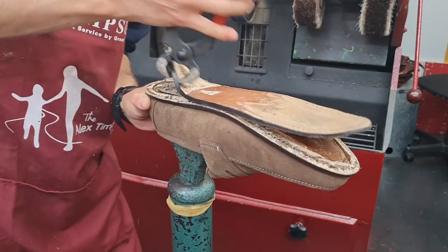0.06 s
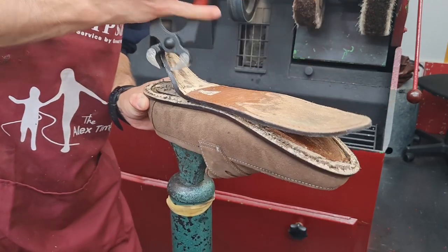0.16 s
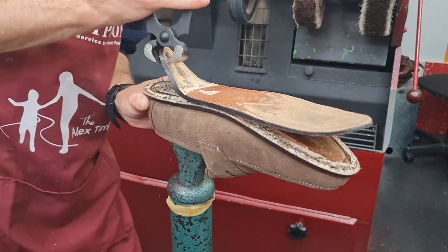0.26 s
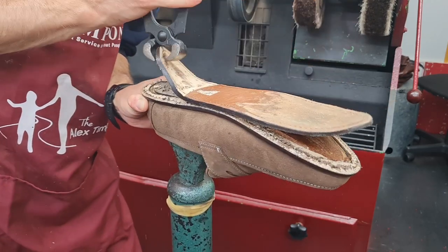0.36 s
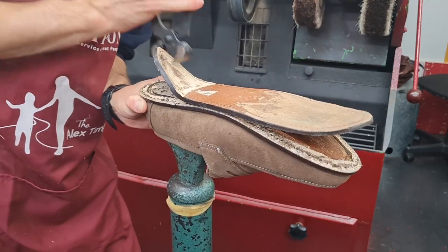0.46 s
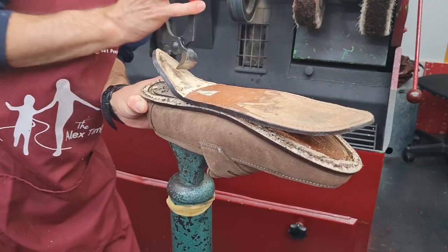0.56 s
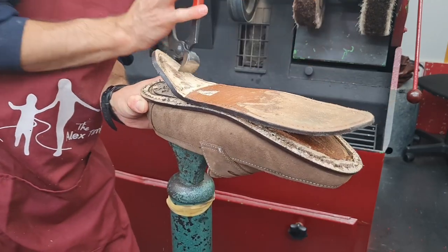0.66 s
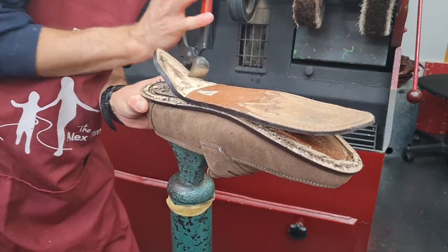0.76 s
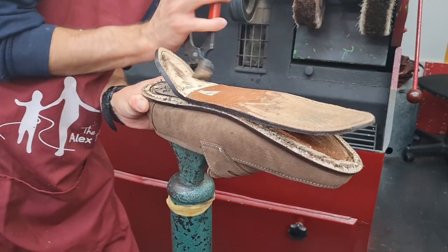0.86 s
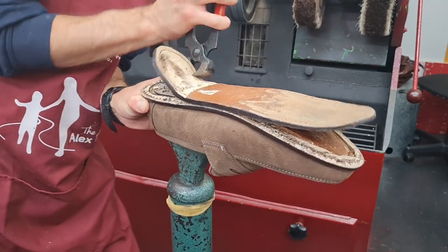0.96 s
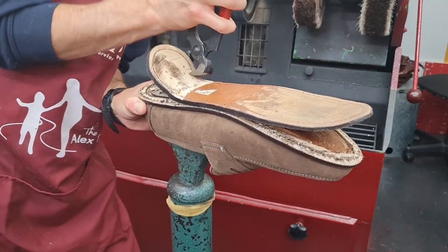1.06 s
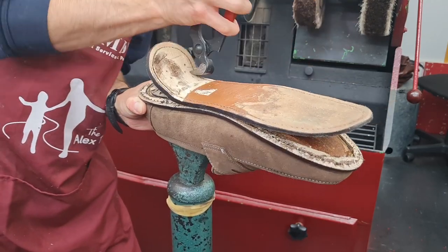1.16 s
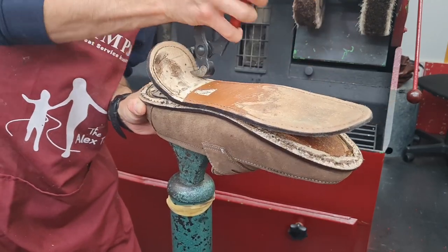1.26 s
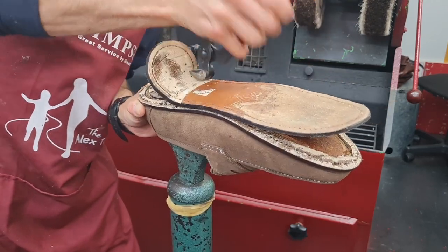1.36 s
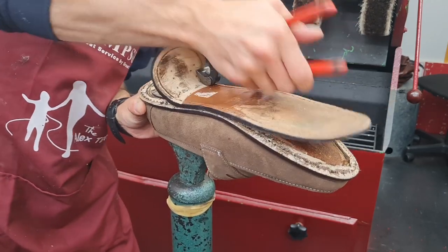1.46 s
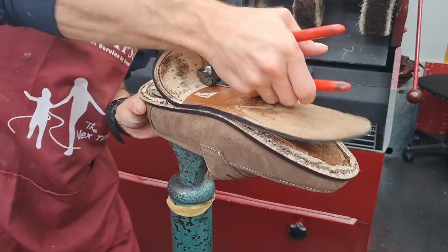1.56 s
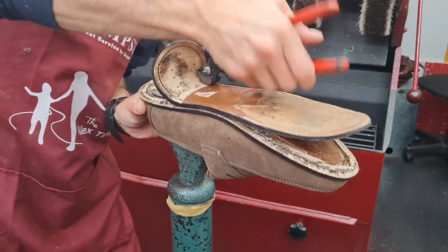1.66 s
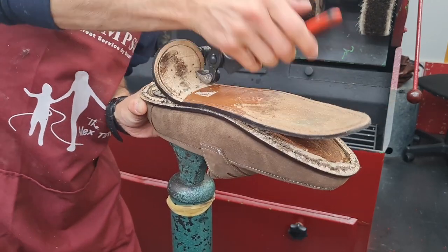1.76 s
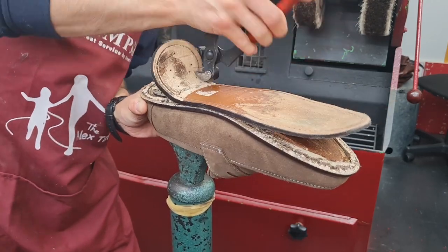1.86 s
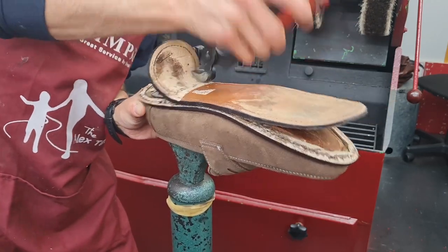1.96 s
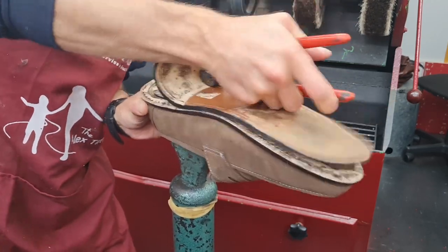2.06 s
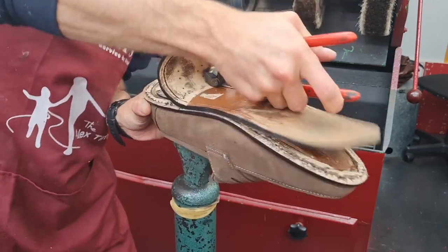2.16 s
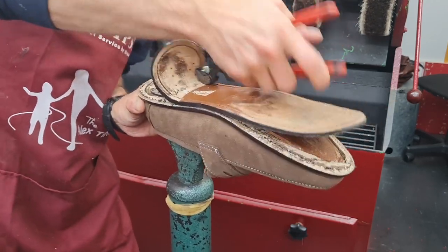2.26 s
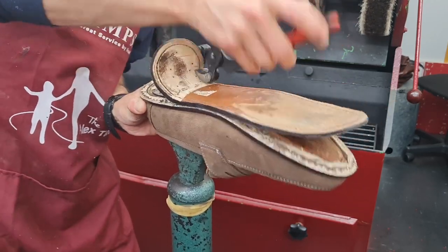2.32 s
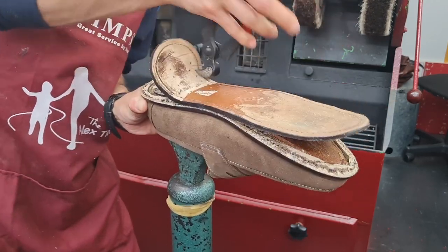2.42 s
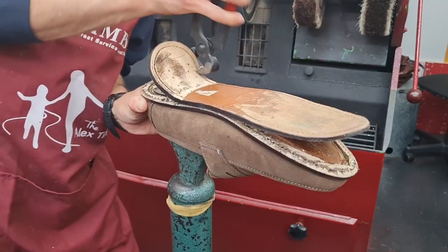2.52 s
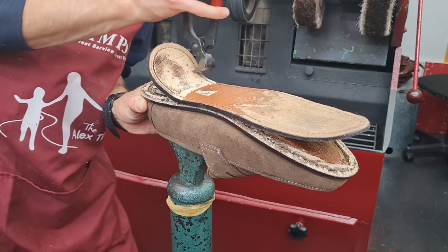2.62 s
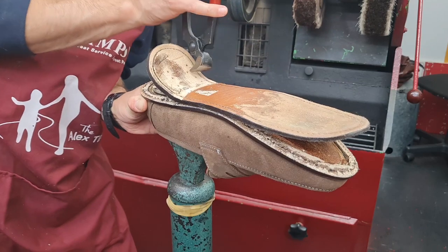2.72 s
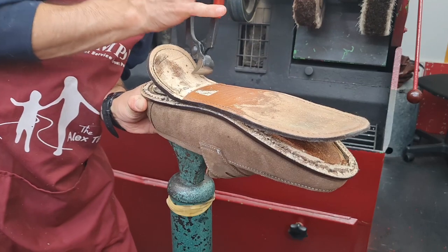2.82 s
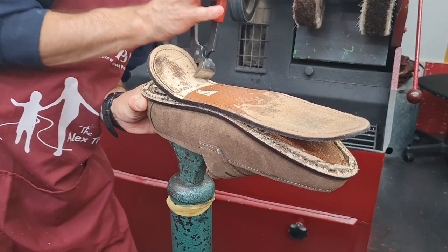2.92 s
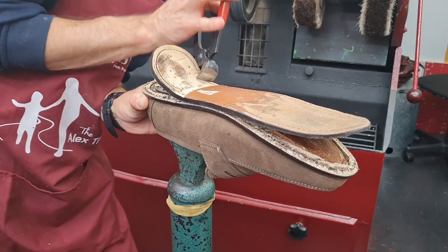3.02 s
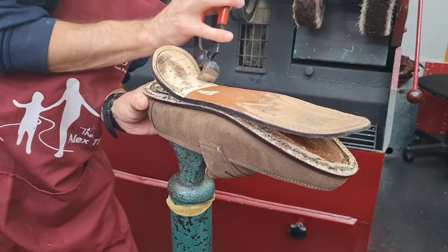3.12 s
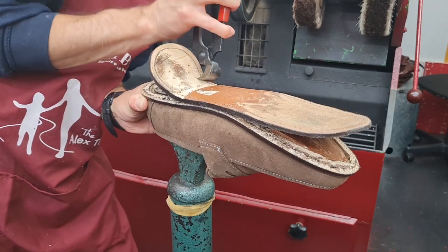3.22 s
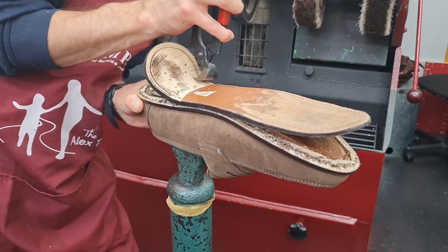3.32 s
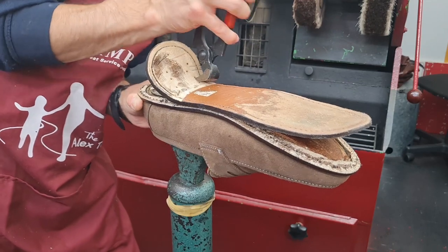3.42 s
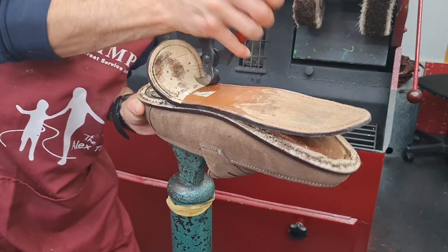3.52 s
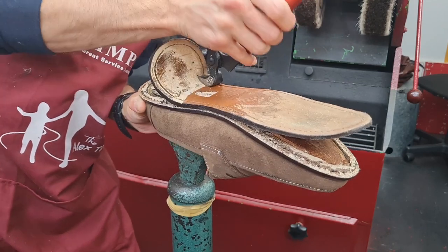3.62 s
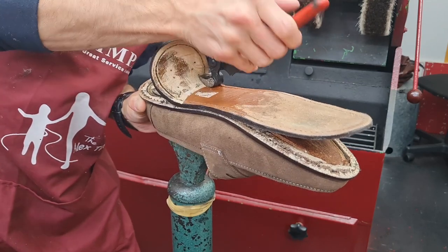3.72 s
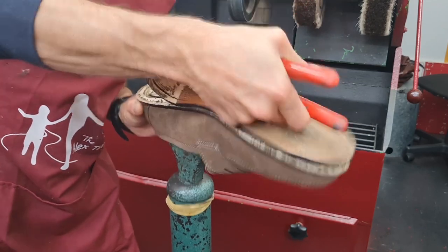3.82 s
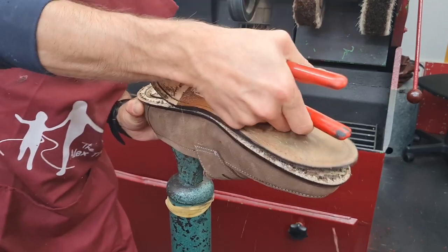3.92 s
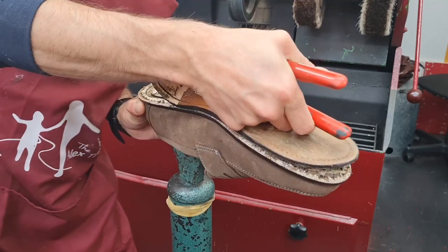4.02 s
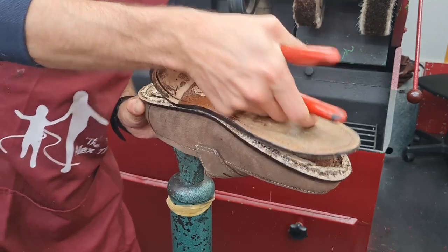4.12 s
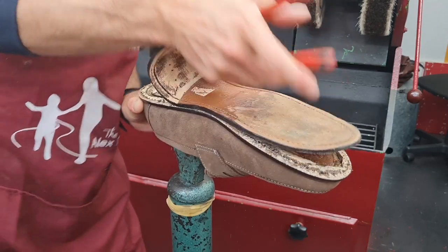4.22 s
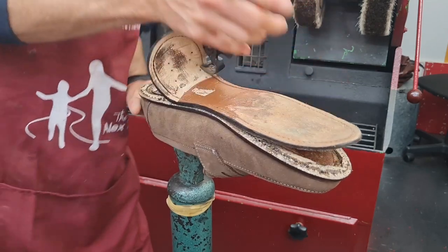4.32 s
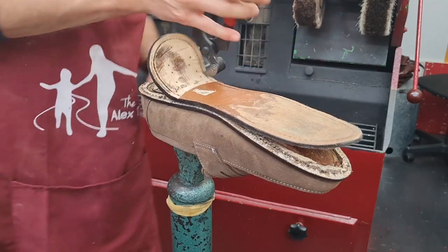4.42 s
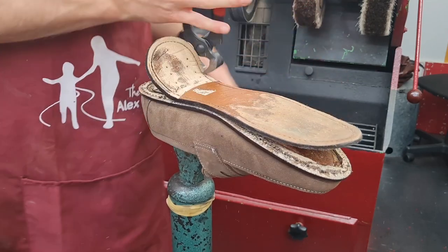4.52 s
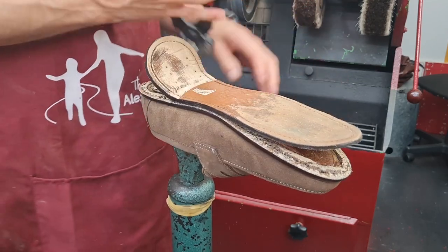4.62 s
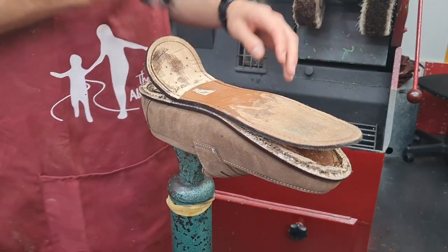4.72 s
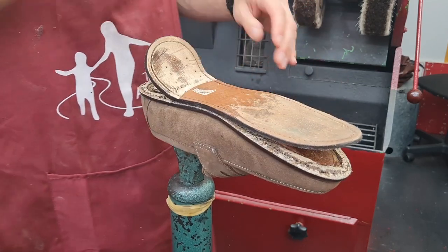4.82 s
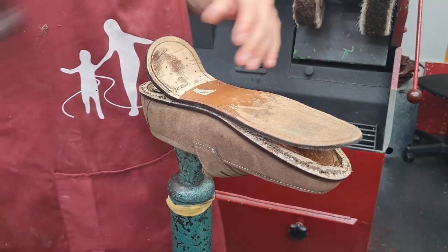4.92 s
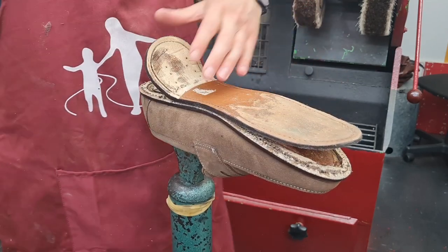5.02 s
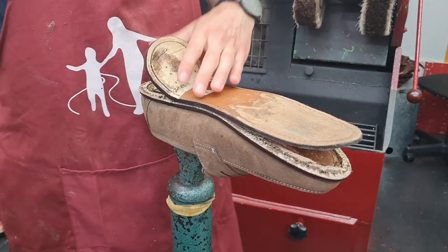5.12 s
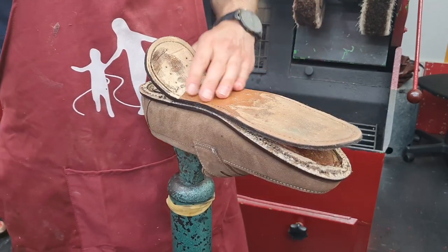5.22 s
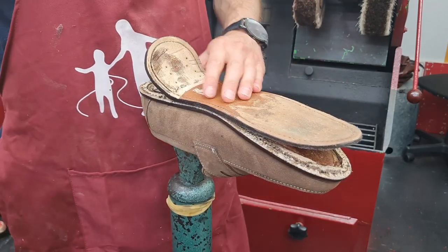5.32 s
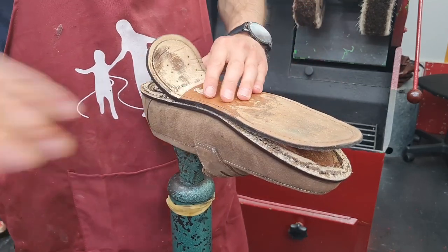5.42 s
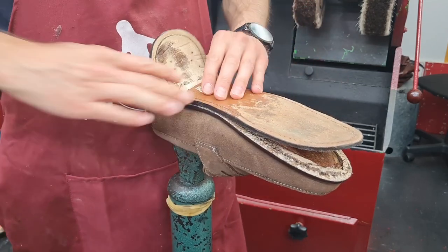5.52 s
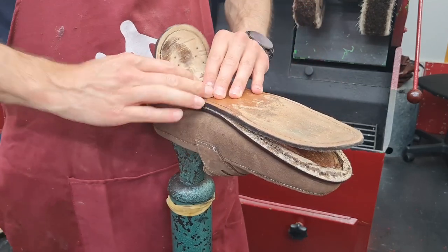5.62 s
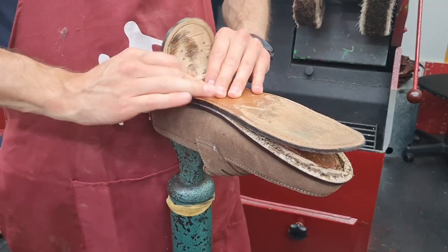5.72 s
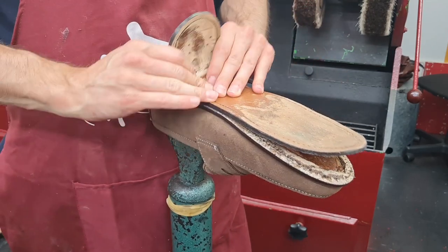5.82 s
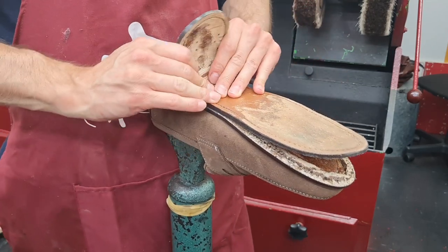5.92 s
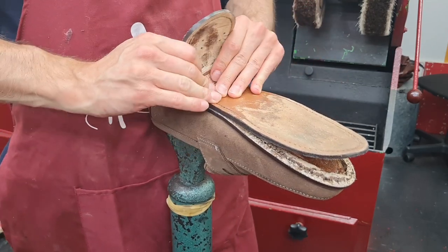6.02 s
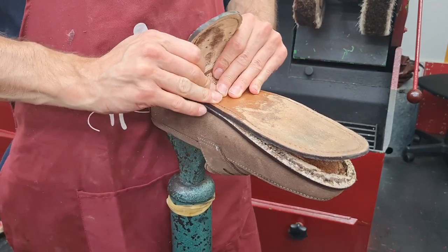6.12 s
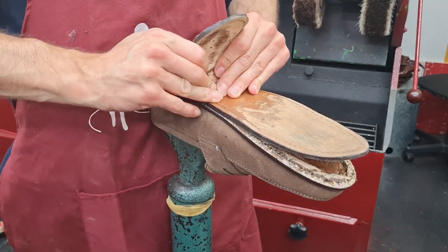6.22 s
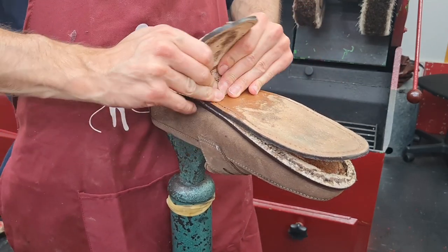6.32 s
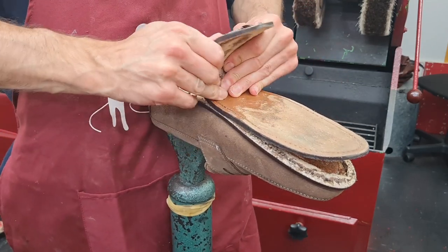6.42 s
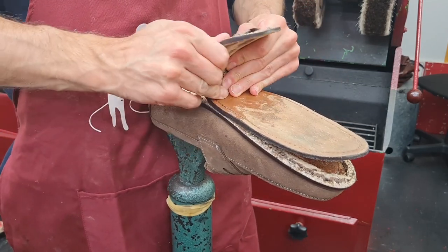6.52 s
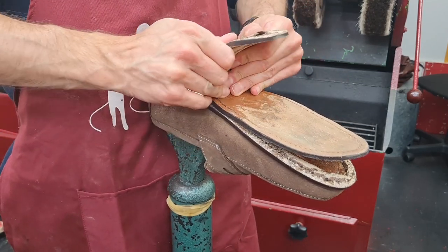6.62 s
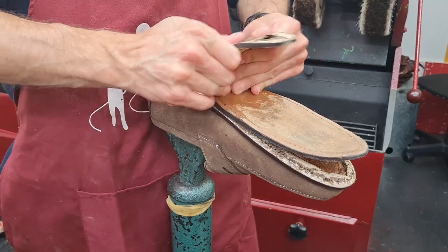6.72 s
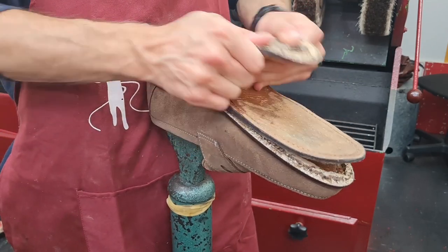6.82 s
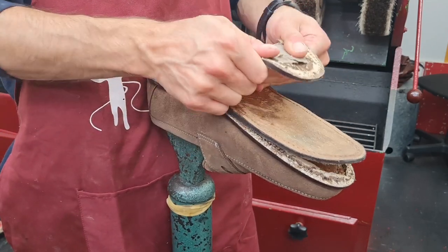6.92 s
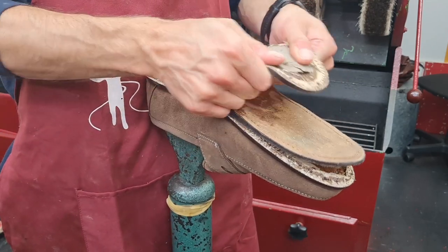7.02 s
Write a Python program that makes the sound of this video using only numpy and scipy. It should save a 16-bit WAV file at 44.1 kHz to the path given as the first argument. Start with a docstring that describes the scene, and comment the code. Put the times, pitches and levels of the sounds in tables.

```python
"""Steel pincers pry the sole off a shoe on an iron stand: noisy bites ring steel modes, then the shoe thumps.
The jaws squeak, tink and sing; short bursts make the sole crack and its threads tick.
The pincers drop on a bench slightly to the left, booming its top; then hands peel the leather back in
random crackling grains, with scuffs and creaks. A decaying noise room answers the blows in a small workshop,
over a low filtered-noise rumble, a drone, a distant wash and a faint wavering hum."""
import sys
import numpy as np
from scipy import signal
from scipy.fft import rfft, irfft, next_fast_len
from scipy.io import wavfile
from scipy.ndimage import map_coordinates

SR = 44100
rng = np.random.default_rng(int(sys.argv[2]) if len(sys.argv) > 2 else 0)


def transcribe(u):
    """Save the signal u as a 16-bit wav file named by the first command-line argument.

    u: samples, shape (n,) or (channels, n), limited to [-1, 1]; the rate is SR.
    q: integer samples, one column per channel.
    """
    v = np.clip(np.atleast_2d(u).T, -1, 1)
    q = np.round(v * 32767).astype(np.int16)
    wavfile.write(sys.argv[1], SR, q)


N = 311778
T = np.arange(SR * 3 // 4) / SR  # time axis of one short sound, s
TOP_HZ = 16000  # upper frequency limit of the finished sound

# rumble under the workshop: t/s, level before a common trim/dB
RUMBLE_LEVEL = [(.4, -54.5), (.8, -62.5), (1.4, -63), (2.7, -45.5), (3, -54.5), (3.7, -47), (4.7, -53.5),
                (5.2, -50), (6.1, -57), (6.9, -45), (7.05, -50.5)]
# drone and distant wash: t/s, drone level before a common trim/dB, wash level/dB
WASH_LEVEL = [(.45, -54.5, -60.5), (1.85, -58.5, -67.5), (2.9, -57.5, -67.5), (3.3, -52.5, -58),
              (3.8, -52.5, -60), (4.3, -44.5, -55), (4.65, -52, -55), (5.7, -53.5, -61), (6.3, -56, -66.5),
              (7, -50.5, -62.5)]
# background colours: f/Hz, density/dB
RUMBLE_COLOUR = [(15, -19.5), (30, -3), (44, 4), (70, 1.5), (115, -0.5), (180, -7), (400, -36.5),
                 (1000, -109.5)]
DRONE_COLOUR = [(90, -22), (135, -16), (185, -11), (220, -2.5), (250, 0.5), (300, 2), (380, -14),
                (600, -30.5), (2000, -69.5)]
WASH_COLOUR = [(150, -18), (400, 0.5), (650, 4), (850, -7), (1130, 0), (1400, -9), (2000, -9.5),
               (3200, -32), (8000, -26), (16000, -43)]
# faint hum that rises twice: t/s, f/Hz, level/dB
HUM = [(3.8, 226, -90), (4.3, 230, -50), (4.6, 233, -48), (4.85, 235, -57), (5.75, 244.7, -52.5),
       (6.1, 230, -58), (6.55, 239.7, -49), (6.77, 253.7, -41.5), (6.9, 265.2, -46), (7.05, 256, -66)]
# reverberation of the small room: f/Hz, t60/s
WALLS = [(60, 0.74), (150, 0.68), (300, 0.35), (700, 0.27), (2000, 0.19), (5000, 0.23), (14000, 0.27)]

# hands and jaws scuffing the leather: start t/s, length/s, stroke level/dB, crackle against rubbing before trims/dB
SCUFFS = [(0.177, 0.057, -50, -14), (0.438, 0.057, -57, -14), (0.74, 0.15, -61, -7),
          (0.945, 0.14, -56, -8.5), (1.492, 0.061, -56, 14), (1.739, .04, -68.5, -13),
          (2.314, .05, -52, -18.5), (2.808, 0.19, -60, -19), (3.031, 0.046, -49, -15.5),
          (3.3, 0.15, -70, -10), (3.677, 0.23, -71.5, 10), (4.189, 0.053, -56.5, -6.5),
          (4.337, .52, -62, -11.5), (5.06, .07, -57.5, -15.5), (5.639, 0.15, -68.5, 0.5)]
SCUFF_ATTACK_S, SCUFF_RELEASE_DB_PER_S = 0.041, 171.5
# friction colours of coarse rubbing and fine peeling: f/Hz, density/dB
RUB_COLOUR = [(200, -22), (700, -1), (1600, -1), (2600, 2), (4300, -5), (7000, -10.5), (16000, -34)]
PEEL_COLOUR = [(1000, -26), (4500, -8.5), (6500, -6.5), (10000, -7.5), (14500, -4), (16000, -6.5)]
# a light scuff is duller than a tug: f/Hz, gain/dB
LIGHT_RUB = [(500, 1), (1000, 3.5), (1600, 5.5), (2400, -0.5), (3500, -6), (5500, -0.5), (12000, -7)]
# tugs that peel the heel back: t of greatest effort/s, level/dB
TUGS = [(6.022, -55), (6.22, -54.5), (6.394, -49.5), (6.475, -41), (6.668, -50), (6.89, -37)]
TUG_RISE_DB_PER_S, TUG_FALL_DB_PER_S = 142, 167
TUG_RUB_DB = -3.5  # rubbing under the crackle of a tug
FLOOR_RUB_DB, FLOOR_CRACKLE_DB = -80, -80  # steady faint rubbing and crackle under the tugs
# creak of the bending sole: f/Hz, density/dB
CREAK_COLOUR = [(150, -24), (310, 7.5), (400, -5.5), (486, 5), (680, 0), (810, -4), (900, -19),
                (1130, -17.5), (1500, -33), (4000, -42)]
# creak of the hardest tug, its dB per dB of effort, its head start
CREAK_DB, CREAK_GROWS, CREAK_LEAD_S = -41, 1.52, 0.012

# threads and glue giving way: t/s, crack level/dB, fizz level/dB, left over right/dB
SNAPS = [(1.5, -58, -54.5, 1), (1.634, -67.0, -52.5, 4.5), (2.008, -71.5, -80.5, -1.5),
         (2.128, -52.5, -65.5, 1.5), (2.423, -61, -72.5, -1), (3.247, -58, -65.5, -2),
         (3.297, -63.5, -73.5, -4), (4.197, -57, -63, -4), (4.385, -65, -72, 2.5), (4.914, -46.5, -40, 8),
         (5.8, -64, -71.5, 0.5), (6.0965, -37.5, -35.5, 1), (6.1706, -48.5, -41, 0),
         (6.307, -53.5, -52, -3.5), (6.496, -58, -54, -0.5), (6.84, -42, -41, 0.5), (6.892, -46, -41.5, -3)]
# the sole cracking loose: t/s, level/dB, extra knock and crack/dB, length/s
CRACKS = [(3.8801, -27, -0.5, 0.002), (3.92, -33.5, -4.5, 0.0068), (3.9291, -23, 6.5, .0014),
          (3.934, -30.5, -3, .008), (4.139, -49, -3, .0016)]
# thud, boom, knock, crack and fizz of every sole crack, ahead of the extra snap: level/dB
CRACK_REGISTERS = [-2, -3, 3, -5.5, -7.5]

# pincers landing and bouncing on the bench: t/s, boom of the bench level/dB, clack level/dB, chatter/s
DROP = [(5.3056, -6.5, -17.5, 0.012), (5.332, -18, -24, 0.0066), (5.363, -34.5, -25, .0074),
        (5.398, -10.5, -10, .013), (5.42, -15, -14.5, 0.0078), (5.4598, -21, -16, 0.0055)]
# bench top modes: f/Hz, level/dB, t60/s
BENCH = [(57, -13, .25), (118, -11, .26), (148, -12, .2), (220, -5, .27), (252, -1, .31), (330, -9, .13),
         (385, -6, .13), (445, -6, .13), (520, -5, .17), (840, -11, .14), (885, -11, .14), (1000, -12, .1),
         (1085, -11, .12), (1819, -19, .15)]

# joint of the pincers tinking: t/s, level/dB, emphasised partial f/Hz
TINKS = [(.009, -64, 2640), (.03, -27, 2484), (1.009, -46, 3770), (1.212, -58.5, 2500),
         (2.089, -48.5, 2610)]
# other modes of the joint: f/Hz, level/dB, t60/s
JOINT = [(1010, -6, .12), (1180, -6, .12), (1700, -2, .12), (3036, -13, .1)]
# jaws squeaking as they slide: t/s, level/dB, start f/Hz, end f/Hz, length/s
SQUEAKS = [(.136, -25, 952, 978, .024), (1.074, -49, 960, 1330, 0.017)]
# jaws springing shut and singing: t/s, level/dB
JAWS = [(.028, -37), (.137, -51), (1.507, -52), (2.143, -25.5), (2.457, -38), (3.957, -36.5)]
JAW_HZ, JAW_T60 = 3350, 0.43  # mean pitch, ring time in s

# pincers biting and slipping: t/s, bite level/dB, shoe recoil level/dB, recoil thud up and boom down/dB, chatter/s
PRIES = [(.004, -35, -29.5, 3.5, 0.048), (.026, -24, -34.5, -2.5, .012), (.066, -43.5, -31.5, 2.5, .012),
         (.134, -28.5, -37.5, 1, 0.02), (.246, -55, -42, -2.5, .024), (1.008, -44.5, -42.5, -1.5, 0.0099),
         (1.069, -56, -52, 3, 0.017), (1.508, -35.5, -37.5, -4, 0.013), (2.087, -53, -42, -0.5, 0.018),
         (2.144, -15.5, -14, 2.5, 0.0089), (2.347, -59, -29, 4.5, 0.032), (2.454, -26, -24, 4.5, 0.0055),
         (2.485, -33.5, -34.5, -3, 0.019), (3.957, -17.5, -19, -2.5, .005), (3.984, -38, -28, 6.5, .01),
         (4.091, -47.5, -35.5, 4, 0.014)]
# shoe on its iron stand, modes: f/Hz, level/dB, t60/s
SHOE = [(59, -14, .38), (110, -18, .36), (139, 0, .2), (166, -9, .32), (256, -4, .33), (291, -7, .36),
        (328, -14, .4), (398, -14, .18), (630, -8, .2), (1015, -8, .12)]
# pincers, modes: f/Hz, level/dB, t60/s
STEEL = [(1020, -3, .13), (1270, 0, .17), (1335, -1, .17), (1595, -6, .16), (1790, -2, .15),
         (1880, -5, .14), (2519, -5, .15), (2700, -6, .13), (3120, -6, .13), (3395, -3, .2),
         (3700, -2, .13), (4134, -6, .17), (4690, -8, .18), (5373, -13, .12), (7316, -12, .16),
         (8600, -12, .15), (9415, -15, .19), (9711, -13, .18), (12340, -12, .11)]
# colour of a hard contact: f/Hz, density/dB
CONTACT_COLOUR = [(40, -5.5), (130, 7.5), (500, 0.5), (1200, -2.5), (2200, -2.5), (3700, -2), (5200, -13.5),
                  (8000, -21.5), (15000, -22)]
# edges of the thud, boom, knock, crack and fizz registers: f/Hz
REGISTERS = [45, 190, 420, 1400, 4800, 16500]
# a hard bite, the treble of a soft one, and what the hard one adds to it
HARD_DB, SOFT_FIZZ_DB, EXTRA_FIZZ_DB = -14.5, -17, 11.5


def amp(db):
    """Decibels to gain."""
    return 10 ** (np.asarray(db) / 20)


def unit(x):
    """Scale to rms 1."""
    return x / np.sqrt(np.mean(x ** 2) + 1e-20)


def onset_unit(x):
    """Scale so that the first 25 ms have rms 1."""
    return x / np.sqrt(np.mean(x[:, :SR // 40] ** 2) + 1e-20)


def along(points, hz):
    """(Hz, value) points read on a log frequency axis."""
    f, v = np.transpose(points)
    return np.interp(np.log(hz + 1), np.log(f + 1), v)


def curves(rows):
    """One value per sample for each column after the time."""
    s, *cols = np.transpose(rows)
    return [np.interp(np.arange(N) / SR, s, c) for c in cols]


def wobble(rate):
    """A smooth random curve, rate knots a second."""
    knots = rng.standard_normal(int(N * rate / SR) + 4)
    return map_coordinates(knots, [np.arange(N) * rate / SR])


def coloured(x, spectrum):
    """x through a causal minimum-phase filter with the given spectrum."""
    n = x.shape[-1]
    size = 2 * next_fast_len(n // 2 + 4096)
    gain = amp(along(spectrum, np.fft.rfftfreq(size, 1 / SR)))
    cepstrum = irfft(np.log(gain))
    # folding the cepstrum onto positive time makes the filter causal
    cepstrum[1:size // 2] *= 2
    cepstrum[size // 2 + 1:] = 0
    return irfft(rfft(x, size) * np.exp(rfft(cepstrum)))[..., :n]


def add(track, s, sound):
    """Mix a stereo sound in at time s."""
    part = track[:, max(0, round(s * SR)):][:, :sound.shape[1]]
    part += sound[:, :part.shape[1]]


def panned(x, db):
    """Louder on the left by db."""
    return x * amp([[db / 2], [-db / 2]])


def noise(spectrum, side_db):
    """Coloured stereo noise of rms 1; side_db sets its width."""
    mid, side = coloured(rng.standard_normal((2, N)), spectrum) * amp([[0], [side_db]])
    return unit(np.array([mid + side, mid - side]))


def room(lag, wet_db, gap=0.00097, wide_hz=520, near_db=5, near=0.036):
    """Direct sound, lag s later on the right, then stronger early and decaying late reflections from the room."""
    hz, t, z = signal.stft(rng.standard_normal((2, len(T))), SR, nperseg=256)
    z = z * amp(-60 * t / along(WALLS, hz)[:, None])
    # reflections build up after gap s; those within about near s are stronger
    swell = (1 - np.exp(-(T / gap) ** 2)) * amp(near_db * np.exp(-(T / near) ** 2))
    mid, side = signal.istft(z, SR, nperseg=256)[1][:, :len(T)] * swell
    # long waves reach both sides alike
    side = signal.sosfilt(signal.butter(1, wide_hz, "high", fs=SR, output="sos"), side)
    response = amp(wet_db) * np.array([mid + side, mid - side]) / np.linalg.norm([mid, side])
    response[0, 0] += 1
    response[1, round(abs(lag) * SR)] += 1
    return response


def contact(chatter, lag, wet_db, grit_db=4):
    """A burst of tiny uneven contacts lasting about chatter s, heard in the room."""
    grit = amp(grit_db * rng.standard_normal(len(T)))
    force = rng.standard_normal(len(T)) * grit * np.exp(-(T / chatter) ** 2)
    heard = signal.fftconvolve(force[None], room(lag, wet_db), axes=1)[:, :len(T)]
    return coloured(heard, CONTACT_COLOUR)


def ring(modes, attack, scatter_db=2, apart_hz=900, detune=0):
    """Decaying modes, each detuned a little at random; high ones reach the two microphones in different phases."""
    hz, db, t60 = np.transpose(modes)[:, :, None]
    hz = hz * (1 + detune * rng.standard_normal(hz.shape))
    size = amp(db + scatter_db * rng.standard_normal(hz.shape) - 60 * T / t60)
    turn = rng.uniform(-0.9, 1, hz.shape) * np.minimum(hz / apart_hz, np.pi / 2)
    sides = [(size * np.sin(2 * np.pi * hz * T + way * turn)).sum(0) for way in (1, -1)]
    return np.array(sides) * (1 - np.exp(-T / attack))


def voiced(x, edges, levels):
    """Split a blow into registers and set how strongly each one speaks at its onset."""
    bands = (signal.butter(3, pair, "band", fs=SR, output="sos") for pair in zip(edges, edges[1:]))
    return [amp(db) * onset_unit(signal.sosfilt(band, x)) for band, db in zip(bands, levels)]


def fibres(spectrum, rate, wet_db, size_db=4):
    """Countless fibres letting go at random, about rate a second, in the room; rms 1."""
    sizes = rng.standard_normal(N) * amp(size_db * rng.standard_normal(N))
    grains = (rng.random(N) < rate / SR) * sizes
    heard = signal.fftconvolve(grains[None], room(lag=.0001, wet_db=wet_db), axes=1)[:, :N]
    return unit(coloured(heard, spectrum))


def workshop(rumble_trim_db=1, drone_trim_db=-1):
    """Filtered noise makes a low rumble, a narrow drone and a soft, wide wash from a distance."""
    rumble_db, = curves(RUMBLE_LEVEL)
    drone_db, wash_db = curves(WASH_LEVEL)
    rumble = amp(rumble_db + rumble_trim_db) * noise(RUMBLE_COLOUR, side_db=-11.5)
    drone = amp(drone_db + drone_trim_db) * noise(DRONE_COLOUR, side_db=-11.5)
    wash = amp(wash_db + 0.48 * wobble(33)) * noise(WASH_COLOUR, side_db=-1.0)
    return rumble + drone + wash


def hum(waver=.006):
    """A soft sine tone wavering in pitch and level, equal on both sides."""
    hz, db = curves(HUM)
    phase = 2 * np.pi * np.cumsum(hz * (1 + waver * wobble(15))) / SR
    return amp(db + 0.53 * wobble(11)) * unit(np.sin(phase))


def stroke(start, length):
    """Gain of one scuff: a quick attack, a hold and a steady fade in dB."""
    t = np.arange(N) / SR - start
    return np.clip(t / SCUFF_ATTACK_S, 0, 1) * amp(-SCUFF_RELEASE_DB_PER_S * np.maximum(t - length, 0))


def scuffing(rub_trim_db=-1.5, crackle_trim_db=-1.0, catching_db=2.5):
    """Hands and jaws slide over the leather, catching and slipping; some strokes tear fine fibres as well."""
    rubbing = coloured(fibres(RUB_COLOUR, rate=450, wet_db=1, size_db=4.5), LIGHT_RUB)
    crackle = fibres(PEEL_COLOUR, rate=2500, wet_db=5.5, size_db=-0.5)
    out = np.zeros((2, N))
    for start, length, db, crackle_db in SCUFFS:
        texture = amp(rub_trim_db) * rubbing + amp(crackle_db + crackle_trim_db) * crackle
        out += amp(db) * stroke(start, length) * texture
    return amp(catching_db * wobble(55)) * out


def effort(lead=0):
    """Gain of the pull on the heel, lead s ahead: each tug builds up until the glue gives, then slackens."""
    t = np.arange(N) / SR + lead
    tugs = [amp(db - np.maximum(TUG_RISE_DB_PER_S * (s - t), TUG_FALL_DB_PER_S * (t - s))) for s, db in TUGS]
    return np.linalg.norm(tugs, axis=0)


def bending():
    """Under a hard tug the layers of the sole slip over each other and sound its low resonances."""
    pull = effort(CREAK_LEAD_S)
    strain = (pull / pull.max()) ** CREAK_GROWS
    return amp(CREAK_DB) * strain * fibres(CREAK_COLOUR, rate=160, wet_db=6.0, size_db=2.5)


def leather(uneven_db=1.5):
    """Under each tug the sole rubs in coarse grains; its finer glued fibres crackle as it lifts."""
    pull = effort()
    rub_gain = amp(FLOOR_RUB_DB) + amp(TUG_RUB_DB) * pull
    rub = rub_gain * fibres(RUB_COLOUR, rate=1000, wet_db=5.5, size_db=3.0)
    peel = (amp(FLOOR_CRACKLE_DB) + pull) * fibres(PEEL_COLOUR, rate=2500, wet_db=3, size_db=2.5)
    return amp(uneven_db * wobble(45)) * (rub + panned(peel, db=-1.0))


def snapping(body_db=-3):
    """Single threads and spots of glue part with a dry tick; the duller the tick, the more body it has."""
    out = np.zeros((2, N))
    for s, crack, fizz, pan_db in SNAPS:
        burst = contact(chatter=.0026, lag=.0001, wet_db=-5.5, grit_db=2)
        tick = coloured(burst, [(1000, -4), (3700, 4.5), (5200, 5.5), (14000, 10.5)])
        levels = [crack + body_db + (crack - fizz), crack, fizz]
        add(out, s, panned(sum(voiced(tick, [500, 1500, 5000, 16500], levels)), pan_db))
    return out


def cracking():
    """The glued sole lets go in short contact bursts that reach both microphones almost together."""
    out = np.zeros((2, N))
    for s, db, snap_db, length in CRACKS:
        levels = np.add(CRACK_REGISTERS, [0, 0, snap_db, snap_db, 0])
        burst = contact(length, lag=.00002, wet_db=2.5)
        add(out, s, amp(db) * sum(voiced(burst, REGISTERS, levels)))
    return out


def dropping(bench_db=3, thud_db=-10.0, crack_db=-5, fizz_db=-18):
    """The pincers land and bounce to the left; contact bursts excite the booming bench, which dulls the steel."""
    out = np.zeros((2, N))
    for s, boom_db, clack_db, chatter in DROP:
        blow = onset_unit(contact(chatter, lag=.00043, wet_db=0.0))
        bench = amp(bench_db) * onset_unit(ring(BENCH, attack=0.0027, apart_hz=586, detune=0.0033))
        dull = coloured(blow + bench, [(2000, 4), (3700, -7.0), (6500, -0.5), (9000, 2.5), (15000, -9.0)])
        # thud follows the boom; crack and fizz follow the clack
        levels = [boom_db + thud_db, boom_db, clack_db, clack_db + crack_db, clack_db + fizz_db]
        add(out, s, sum(voiced(dull, REGISTERS, levels)))
    return panned(out, db=2.5)


def tinking(partial_db=2, partial_t60=0.16):
    """The loose joint rattles as the pincers open; the angle of the jaws sets its emphasised partial."""
    out = np.zeros((2, N))
    for s, db, hz in TINKS:
        modes = JOINT + [(hz, partial_db, partial_t60)]
        add(out, s, amp(db) * onset_unit(ring(modes, attack=0.00082, apart_hz=2000, detune=0.0058)))
    return out


def squeaks(rough=0.12):
    """Steel sticks and slips for about twenty cycles, its pitch roughened from sample to sample."""
    out = np.zeros((2, N))
    for s, db, start_hz, end_hz, length in SQUEAKS:
        glide = np.interp(T, [0, length], [start_hz, end_hz])
        hz = glide * (1 + rough * rng.standard_normal(len(T)))
        phase = 2 * np.pi * np.cumsum(hz) / SR
        envelope = np.sqrt(np.abs(np.sin(np.pi * np.minimum(T / length, 1))))
        tone = (np.sin(phase) + amp(-15.5) * np.sin(2 * phase)) * envelope
        heard = signal.fftconvolve(tone[None], room(lag=.0001, wet_db=-10.0), axes=1)
        add(out, s, amp(db) * onset_unit(heard))
    return out


def singing(rise=.005, waver_hz=9):
    """One mode of the free jaws rings on, towards the right, and wavers as they move."""
    out = np.zeros((2, N))
    for s, db in JAWS:
        phase = 2 * np.pi * np.cumsum(JAW_HZ + waver_hz * wobble(90)[:len(T)]) / SR
        envelope = amp(-60 * T / JAW_T60) * (1 - np.exp(-T / rise))
        tone = np.sin(phase - np.array([[0], [np.pi / 3]])) * envelope
        add(out, s, panned(amp(db) * tone, db=-9))
    return out


def prying(steel_db=-9, shoe_db=6, knock_db=-1, crack_db=0.0, recoil=.003):
    """Jaws chatter over leather and ring, brighter the harder they bite; recoil s later the shoe thumps."""
    out = np.zeros((2, N))
    for s, bite_db, recoil_db, depth_db, chatter in PRIES:
        scrape = onset_unit(contact(chatter, lag=.00012, wet_db=7, grit_db=1.0))
        body = amp(shoe_db) * onset_unit(ring(SHOE, attack=0.0035, scatter_db=4.5, detune=.008))
        steel = amp(steel_db) * onset_unit(ring(STEEL, attack=0.0012, apart_hz=634, detune=0.005))
        thump = sum(voiced(scrape + body, REGISTERS[:3], [depth_db, -depth_db]))
        add(out, s + recoil, amp(recoil_db) * thump)
        # leather between the jaws cushions the highest treble
        cushion = [(4500, 1.0), (6000, -0.5), (8500, -0.5), (10500, -3.5), (15000, -10.5)]
        cushioned = coloured(scrape + steel + amp(-10.0) * body, cushion)
        fizz_db = SOFT_FIZZ_DB + EXTRA_FIZZ_DB * amp(bite_db - HARD_DB)
        bite = sum(voiced(cushioned, REGISTERS[2:], [knock_db, crack_db, fizz_db]))
        add(out, s, amp(bite_db) * bite)
    return out


def scene():
    """All sources at the two microphones."""
    background = workshop() + hum()
    sole = scuffing() + bending() + leather() + snapping() + cracking()
    pincers = dropping() + tinking() + squeaks() + singing() + prying()
    return background + sole + pincers


def record(dry):
    """The left microphone hears more treble; peaks clip at full scale, then everything above TOP_HZ is cut."""
    left = coloured(dry[0], [(4000, 0), (8500, 0.93), (14000, 4.0)])
    right = coloured(dry[1], [(4000, 0.5), (8500, -0.5), (14000, -1.5)])
    size = next_fast_len(N + SR // 2)
    clipped = np.clip([left, right], -1, 1)
    passed = np.fft.rfftfreq(size, 1 / SR) < TOP_HZ
    return irfft(rfft(clipped, size) * passed, size)[:, :N]


dry = scene()
out = record(dry)
transcribe(out)
```